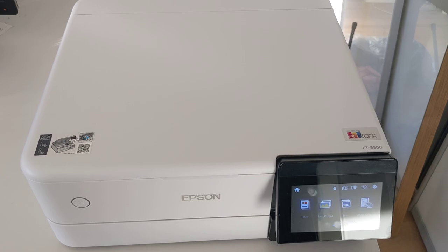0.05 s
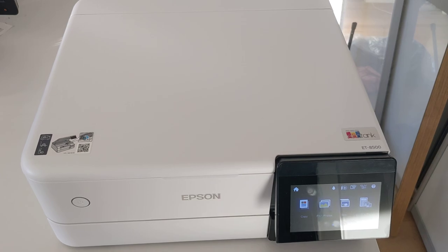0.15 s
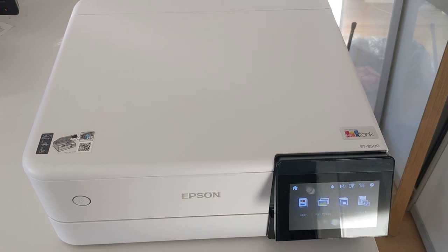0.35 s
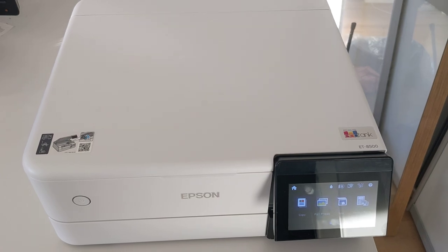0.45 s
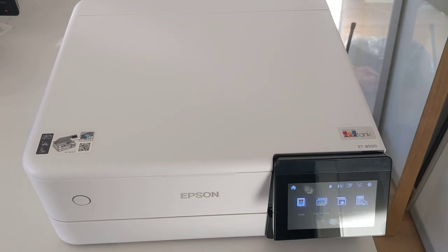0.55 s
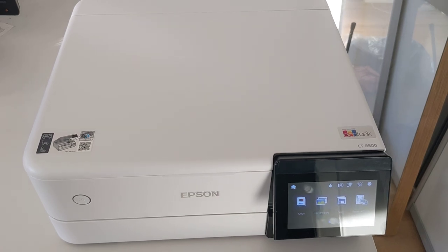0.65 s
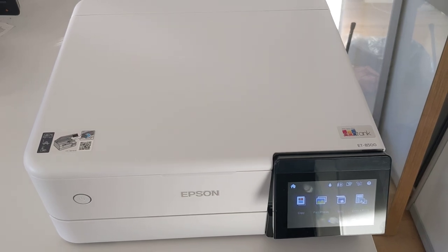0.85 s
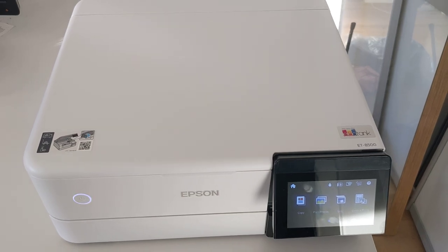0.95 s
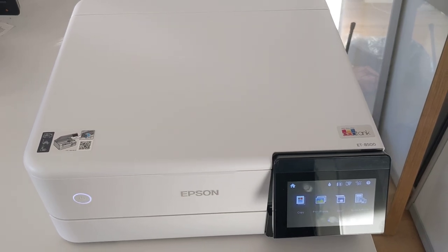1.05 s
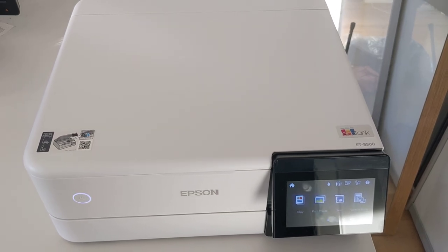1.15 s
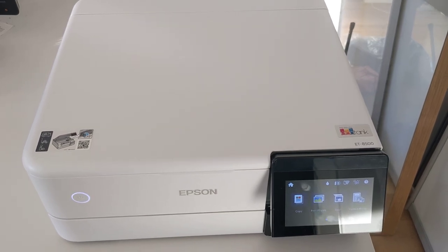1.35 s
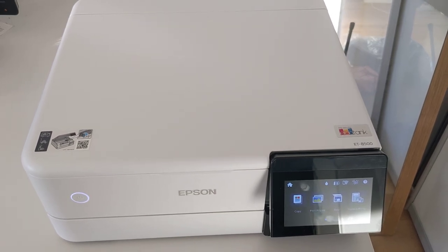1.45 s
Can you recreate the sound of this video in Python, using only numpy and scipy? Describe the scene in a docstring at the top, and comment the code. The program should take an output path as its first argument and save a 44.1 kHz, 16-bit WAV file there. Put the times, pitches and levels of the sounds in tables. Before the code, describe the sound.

A plastic printer part snaps into place with one loud clack at about 0.25 seconds, after a barely audible slide with tiny squeaks. The clack is sharp with a hollow knock, and its ring dies by about 0.7 seconds. A faint spring tone fades over the next second. A low hum underlies the small, quiet room, with a very soft bump near 1.5 seconds.

```python
"""Printer part snapping home

A plastic part of a desktop printer slides with faint squeaks, then snaps home with one loud clack:
sharp contacts and dull knocks ring the hollow case and leave a spring humming for a second.
A small, quiet room answers; a low hum lies underneath, with a soft bump before and after."""
import sys
import numpy as np
from scipy import signal
from scipy.fft import rfft, irfft, next_fast_len
from scipy.io import wavfile
from scipy.ndimage import map_coordinates

SR = 44100
rng = np.random.default_rng(int(sys.argv[2]) if len(sys.argv) > 2 else 0)


def master(y):
    """Save y as 16-bit WAV."""
    cut = np.clip(np.atleast_2d(y).T, -1, 1)
    pcm = np.round(cut * 32767)  # scale
    wavfile.write(sys.argv[1], SR, pcm.astype(np.int16))


N = 66150
T = np.arange(N) / SR


def amp(db):
    """Decibels to gain."""
    return 10 ** (np.asarray(db) / 20)


def along(points, hz):
    """Interpolate (hz, value) points on a log frequency axis."""
    freqs, values = np.transpose(points)
    return np.interp(np.log(hz + 1), np.log(freqs + 1), values)


def pan(db):
    """Stereo gains; positive db leans left."""
    return amp(np.array([[.5], [-.5]]) * db)


def wobble(rate_hz):
    """Smooth random curve."""
    return map_coordinates(rng.standard_normal(N // 10), [T * rate_hz])


def filtered(x, response):
    """Apply a gain given as a function of frequency."""
    size = next_fast_len(N + SR // 2)
    return irfft(rfft(x, size) * response(np.fft.rfftfreq(size, 1 / SR)), size)[..., :N]


def noise(colour, correlation, peaks=()):
    """Unit-rms stereo noise with a given spectrum, left-right correlation and resonances."""
    def mid_side(hz):
        angle = np.arccos(np.clip(along(correlation, hz), -1, 1)) / 2
        return amp(along(colour, hz)) * [np.cos(angle), np.sin(angle)]

    def resonances(hz):
        gain = 1
        for centre_hz, width_hz, lift_db, pan_db in peaks:
            bell = 1 / (1 + (2 * (hz - centre_hz) / width_hz) ** 2)
            gain = gain * amp(lift_db * bell) * pan(pan_db * bell)
        return gain

    mid, side = filtered(rng.standard_normal((2, N)), mid_side)
    out = filtered(np.array([mid + side, mid - side]), resonances)
    return out / np.sqrt(np.mean(out ** 2) + 1e-20)


def since(start_s):
    """Seconds since start_s, zero before it."""
    return np.maximum(T - start_s, 0)


def onset(start_s, attack_s):
    """Exponential rise from 0 to 1."""
    return 1 - np.exp(-since(start_s) / attack_s)


def struck(start_s, attack_s, t60_s):
    """Envelope of a blow: quick rise, exponential decay."""
    return onset(start_s, attack_s) * np.exp(-np.log(1000) * since(start_s) / t60_s)


# freq_hz, density_db
HUM_COLOUR = [(25, -16.5), (50, -3.5), (85, 4), (125, -6.5), (200, 1), (300, -5.5), (600, -7),
              (1300, -11.5), (3000, -17), (7000, -21), (10500, -25.5), (12500, -23), (16000, -22)]
# freq_hz, left_right_correlation
QUIET_CORRELATION = [(60, -0.059), (240, 0.72), (950, -0.088), (3770, -0.23), (15000, 0.0)]


def hum():
    """The room hums with steady low noise."""
    return amp(-66) * noise(HUM_COLOUR, QUIET_CORRELATION)


# freq_hz, density_db
SLIDE_COLOUR = [(40, -28), (110, -16), (165, 4.5), (260, -9), (420, -10.5), (550, -1.5), (700, -8.5),
                (1100, -4), (1700, -7), (2600, -12), (6000, -22), (16000, -31)]
# start_s, start_pitch_hz, initial_rise_hz_per_s, level_db
SQUEAKS = [(.01, 1180, 5500, -69), (.12, 795, 199.5, -62.5), (.13, 1010, -200, -64)]


def slide(glide_s=.076):
    """Plastic rubs on plastic until the snap, with faint squeaks whose glides level off."""
    out = amp(-63.5) * noise(SLIDE_COLOUR, QUIET_CORRELATION)
    for start_s, hz, rise_hz_per_s, db in SQUEAKS:
        pitch_hz = hz + rise_hz_per_s * glide_s * onset(start_s, glide_s)
        roughness_rad = 1.1 * wobble(rate_hz=150)
        phase = 2 * np.pi * np.cumsum(pitch_hz) / SR + roughness_rad
        out += amp(db) * onset(start_s, attack_s=.012) * np.sin(phase)
    return (T < SNAP_S) * out


# centre_s, level_db, pitch_hz, half_width_s
BUMPS = [(.025, -60.5, 152.5, 0.023), (1.458, -54.5, 96, 0.0079)]


def bumps():
    """Each soft bump is a few low cycles that swell and fade."""
    out = np.zeros(N)
    for centre_s, db, hz, half_width_s in BUMPS:
        t = T - centre_s
        out += amp(db) * np.exp(-(t / half_width_s) ** 2) * np.sin(2 * np.pi * hz * t)
    return out


# freq_hz, density_db
CATCH_COLOUR = [(80, -34.5), (250, -16), (600, 0.5), (1400, 5), (3000, -2), (4500, -3), (7000, 0),
                (10000, -1.5), (12500, 2), (15500, -1)]
# freq_hz, left_right_correlation
CLACK_CORRELATION = [(100, -0.092), (300, 0.79), (700, .4), (1400, -0.3), (3000, -0.13), (12000, 0)]
# centre_hz, width_hz, lift_db, pan_db
PANEL_RESONANCES = [(1413, 46, 3.5, -2), (1884, 90, 3.5, -2), (2340, 400, 6, -4), (2810, 110, 5.5, -1.5),
                    (3340, 180, 6, 7.5), (6990, 470, 6, 4.5), (8920, 160, 4.5, 7.5), (13500, 390, 3, 6)]
# start_s, level_db, pan_db
CATCH_CONTACTS = [(.2325, -39, 3.5), (.2359, -13.5, 4), (0.239, -14.5, 1), (0.2432, -21, 5),
                  (0.2633, -27.5, 7.5), (0.2764, -29, 4), (.2835, -28.5, -0.5)]
SNAP_S = CATCH_CONTACTS[1][0]


def catch(attack_s=.0002):
    """The catch touches, snaps and chatters: each contact is a hard crack and a bright panel ring."""
    power = np.zeros((2, N))
    for start_s, db, pan_db in CATCH_CONTACTS:
        crack = amp(3.5) * struck(start_s, attack_s, t60_s=.0061)
        ring = struck(start_s, attack_s, t60_s=.046)
        power += (amp(db) * pan(pan_db) * (crack + ring)) ** 2
    return np.sqrt(power) * noise(CATCH_COLOUR, CLACK_CORRELATION, PANEL_RESONANCES)


# freq_hz, density_db
CLATTER_COLOUR = [(100, -30), (350, -12), (550, -3), (750, -6), (1100, -0.5), (2700, -5.5), (4200, -17),
                  (9000, -27.5), (16000, -31.5)]


def clatter():
    """The crowded modes of the thin panels ring briefly."""
    envelope = amp(-14.5) * struck(SNAP_S, attack_s=.0043, t60_s=.13)
    return envelope * noise(CLATTER_COLOUR, CLACK_CORRELATION, PANEL_RESONANCES)


# freq_hz, density_db
ROOM_COLOUR = [(25, -27.5), (50, -9.5), (100, -11), (140, -7), (280, -0.5), (420, -2.5), (900, -1.5),
               (1500, -3), (2800, -8), (4200, -11.5), (6300, -14), (7900, -13), (10500, -16),
               (12500, -12.5), (15500, -16)]


def room(mid_t60_s=.42, bass_hz=30, air_hz=23000, panel_share=.6, linger_stretch=2.3, linger_cut_hz=4500):
    """The room answers the snap: bass lasts longer, air absorbs treble, a faint dull tail lingers."""
    peaks = [(hz, width_hz, panel_share * lift_db, panel_share * pan_db)
             for hz, width_hz, lift_db, pan_db in PANEL_RESONANCES]
    hz, t, spectrum = signal.stft(noise(ROOM_COLOUR, CLACK_CORRELATION, peaks), SR, nperseg=512)
    hz = np.maximum(hz, hz[1] / 2)[:, None]
    t60_s = mid_t60_s * (1 + bass_hz / hz) / (1 + (hz / air_hz) ** 2)
    fall = np.log(1000) * np.maximum(t - SNAP_S, 0) / t60_s
    linger = amp(-23.5) * np.exp(-fall / linger_stretch) / (1 + (hz / linger_cut_hz) ** 2)
    fade = np.hypot(np.exp(-fall), linger)
    tail = signal.istft(spectrum * fade, SR, nperseg=512)[1][:, :N]
    return amp(-16.5) * onset(SNAP_S, attack_s=.01) * tail


# start_s, force_db
LANDINGS = [(0.2384, -1.5), (.2744, -8.5)]
# pitch_hz, gain_db, t60_s, pan_db
CASE_MODES = [(146.67, -18, .28, -1), (159, -21, 0.31, -3), (178, -24, 0.4, -1), (207.4, -20.5, 0.35, 1),
              (253.2, -20.5, .33, 2.5), (267, -6, .045, 2), (283.55, -15, .21, -1), (308.4, -27.5, .27, -1),
              (330.3, -31, 0.5, 0.5), (527, -15, .06, 0), (543.3, -23.5, 0.35, -2), (711, -30.5, .36, -2.5),
              (867, -22.5, .31, -6.5), (980.6, -17.5, .14, -4.5), (1129, -22, .14, -8),
              (1140, -29.5, 0.27, -7), (1358, -25.5, 0.19, -1.5), (1390, -25, .22, -5.5),
              (1733, -25, .26, -6.5), (2434, -29, 0.22, -1.5), (2900, -25, 0.18, 1), (3160, -33, 0.29, 5),
              (3460, -24, .1, 2)]
ATTACK_PER_T60 = .016


def case(wander_rad=.2, spread_rad_per_khz=.6):
    """The part lands, then settles; each blow rings the modes of the hollow case."""
    out = np.zeros((2, N))
    for hz, db, t60_s, pan_db in CASE_MODES:
        stereo_rad = np.array([[1], [-1]]) * spread_rad_per_khz * hz / 1000
        drift_rad = wander_rad * wobble(rate_hz=40) + stereo_rad
        for start_s, force_db in LANDINGS:
            envelope = amp(db + force_db) * struck(start_s, ATTACK_PER_T60 * t60_s, t60_s)
            out += pan(pan_db) * envelope * np.sin(2 * np.pi * hz * since(start_s) + drift_rad)
    return out


# pitch_hz, level_db, t60_s
SPRING_MODES = [(204.7, -44, 1.5), (326.5, -53.5, 2.8), (656, -61.5, 1.4), (989, -61.5, 2.1)]


def spring(waver_db=1):
    """The spring's faint modes outlast the clack, wavering a little in level."""
    start_s = LANDINGS[0][0]
    out = np.zeros(N)
    for hz, db, t60_s in SPRING_MODES:
        gain = amp(db + waver_db * wobble(rate_hz=29))
        envelope = struck(start_s, ATTACK_PER_T60 * t60_s, t60_s)
        out += gain * envelope * np.sin(2 * np.pi * hz * since(start_s))
    return out


# centre_s, level_db, half_width_s
KNOCKS = [(0.242, -16.5, 0.00099), (0.2456, -7.5, 0.00044), (.2524, -16.5, .0007)]


def knocks():
    """The part knocks against its stop: each time one short push of air with its recoil."""
    push = lambda u: (2 * u ** 2 - 1) * np.exp(-u ** 2)
    return sum(amp(db) * push((T - centre_s) / half_width_s) for centre_s, db, half_width_s in KNOCKS)


# freq_hz, pan_db
TAIL_PAN = [(150, 0.5), (400, 2), (700, -1), (1300, -4.5), (2600, -1.5), (5000, 5.5), (13000, 4)]


def scene(case_cut_hz=110):
    """Slide, clack and bumps over the hum; the clack's treble leans left, its midrange right."""
    radiation = lambda hz: 1 - 1 / (1 + (hz / case_cut_hz) ** 4)  # the case radiates little deep bass
    body = filtered(knocks() + case(), radiation)
    clack = catch() + body + spring()
    tail = filtered(clatter() + room(), lambda hz: pan(along(TAIL_PAN, hz)))
    return clack + tail + slide() + bumps() + hum()


def record(dry, top_hz=15600):
    """Steep low-pass at the band limit."""
    return filtered(dry, lambda hz: 1 / np.sqrt(1 + (hz / top_hz) ** 140))


dry = scene()
out = record(dry)
master(out)
```